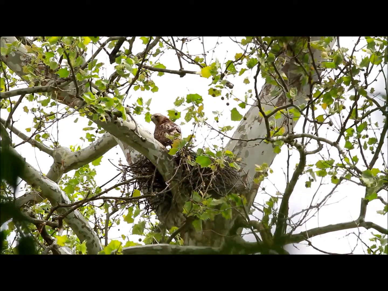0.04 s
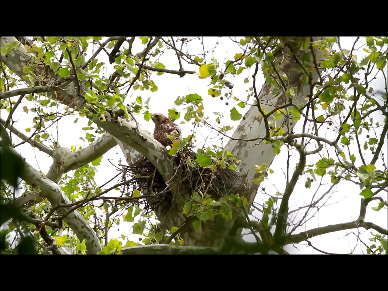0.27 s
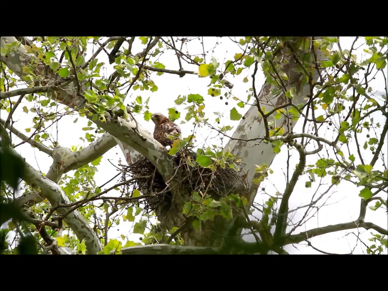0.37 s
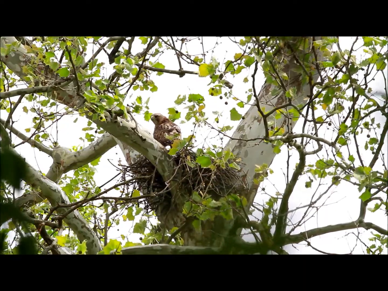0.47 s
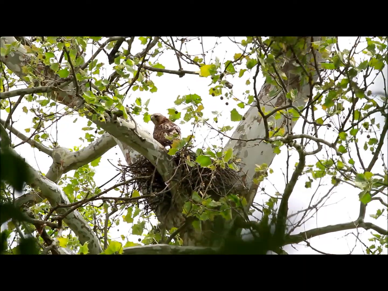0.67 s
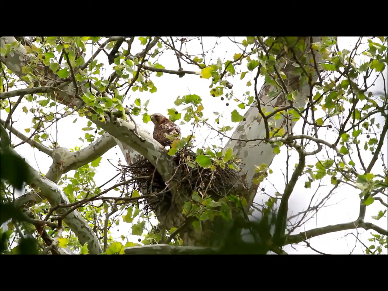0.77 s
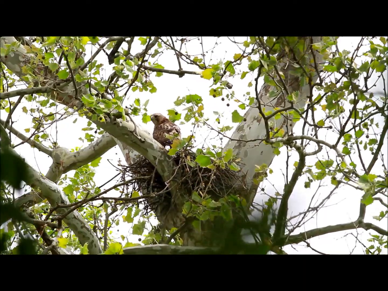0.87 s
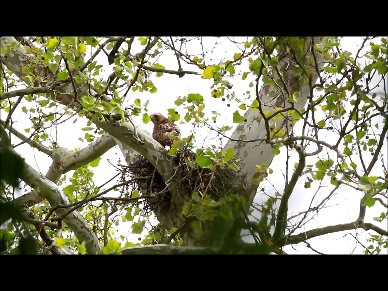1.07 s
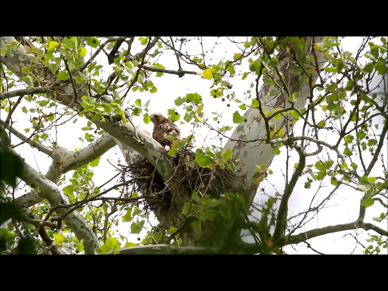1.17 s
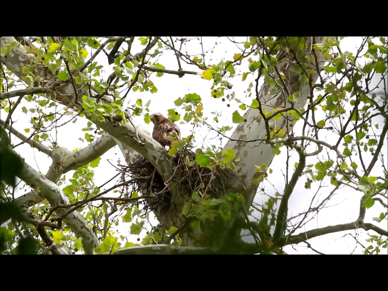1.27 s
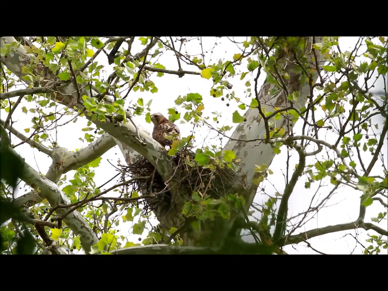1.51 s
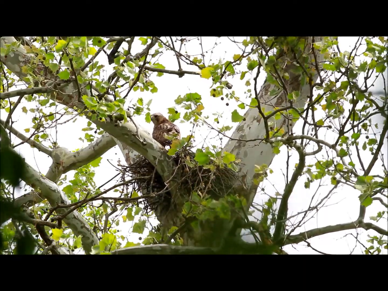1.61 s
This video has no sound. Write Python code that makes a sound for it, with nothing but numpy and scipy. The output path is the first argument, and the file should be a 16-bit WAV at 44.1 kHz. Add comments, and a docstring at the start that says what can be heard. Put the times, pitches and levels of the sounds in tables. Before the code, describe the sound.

A hawk gives a sharp, high, slightly raspy chirp at about 0.25 seconds, echoing briefly among the trees. From 0.5 seconds, faint short bird calls repeat farther off, with two hissy chips near 0.6 and 1.1 seconds. The hawk chirps again, more softly, at about 1.15 seconds, and one last distant call follows at 1.5. A soft rumble of air and distant traffic runs throughout.

```python
"""A soft rumble of air and distant traffic runs throughout. A hawk chirps sharply among trees, both sides
of its voice box sounding at once: it sweeps up with a rasp, holds two tones and drops away, and trunks
and leaves scatter the sound. Farther off, faint arched calls begin, with two hissy chips among them.
The hawk chirps again, more softly, and one last far call follows."""
import sys
import numpy as np
from scipy import signal
from scipy.fft import rfft, irfft
from scipy.io import wavfile

SR = 44100
rng = np.random.default_rng(int(sys.argv[2]) if len(sys.argv) > 2 else 0)


def transcribe(signal):
    """Save signal, clipped to [-1, 1], as a 16-bit WAV file at the path in sys.argv[1]."""
    frames = np.atleast_2d(signal).T
    limited = np.clip(frames, -1, 1)
    pcm = np.round(limited * 32767).astype(np.int16)
    wavfile.write(sys.argv[1], SR, pcm)


N = 72765
T = np.arange(N) / SR
BIN_HZ = np.arange(N // 2 + 1) * SR / N


def from_db(db):
    """Decibels to gain."""
    return 10 ** (np.asarray(db) / 20)


def rms_one(x):
    """Scale to rms 1."""
    return x / np.sqrt(np.mean(x ** 2) + 1e-20)


def at_hz(points, hz):
    """Read a curve on a log-frequency axis."""
    freqs, values = np.transpose(points)
    return np.interp(np.log(np.maximum(hz, 1)), np.log(freqs), values)


def noise(spectrum):
    """Noise coloured by an EQ curve, rms 1."""
    return rms_one(irfft(rfft(rng.standard_normal(N)) * from_db(at_hz(spectrum, BIN_HZ)), N))


def narrow(hz, width_hz):
    """Noise in one steep resonance, rms 1; at 0 Hz a random wobble."""
    resonance = 1 + (2 * (BIN_HZ - hz) / width_hz) ** 2
    return rms_one(irfft(rfft(rng.standard_normal(N)) / resonance, N))


# Colour of the air and traffic: freq_hz, gain_db
AIR_EQ = [(25, -15), (40, -24), (62, -2), (80, -5), (115, 0), (170, -4), (320, -5.5), (480, -4), (800, -8),
          (1300, -13.5), (2000, -14.5), (4000, -19), (6300, -23.5), (8200, -29.5), (10500, -31.5),
          (13300, -31.5), (15500, -40)]
# Distant engine drone: pitch_hz, level_db
DRONE_TONES = [(122.5, -63), (246, -52.5)]
# Gentle fader ride on the whole bed: time_s, gain_db
BED_RIDE = [(0, 0), (.45, 0), (.7, 0.1), (1, -0.5), (1.35, -0.35), (1.65, -0.3)]


def air_and_traffic():
    """A soft bed of air and far traffic with a faint engine drone."""
    rumble = from_db(-39.5) * noise(AIR_EQ)
    drone = sum(from_db(db) * narrow(hz, width_hz=9.2) for hz, db in DRONE_TONES)
    return from_db(np.interp(T, *np.transpose(BED_RIDE))) * (rumble + drone)


def voice_phase(hz):
    """Running phase of a voice whose pitch wavers by 0.6 percent."""
    return 2 * np.pi * np.cumsum(hz * (1 + .006 * narrow(0, width_hz=540))) / SR


def call_stages(start_s, rise_s, hold_s, fall_s):
    """A call's stage (rise 0-1, hold 1-2, fall 2-3) and a soft gate round it."""
    stage = np.interp(T, start_s + np.cumsum([0, rise_s, hold_s, fall_s]), np.arange(4))
    return stage, np.clip(np.minimum(stage, 3 - stage) / .08, 0, 1)


# Colour of the rasp: freq_hz, gain_db
RASP_EQ = [(1500, -26), (2600, -2.5), (4000, -7.5), (5300, 2.5), (6600, -9), (7500, -10.5), (10000, -16.5),
           (11400, -10), (13000, -15), (15500, -29)]
# Rough squeaks inside the rasp: pitch_hz, gain_db
RASP_SQUEAKS = [(5100, -8.5), (5530, -9)]
# Envelope of the rasp: stage, gain_db
RASP_ENVELOPE = [(0, -4), (.6, 3), (1, 2), (2, -11), (3, -22)]


def hawk_rasp(stage, level_db):
    """Squeaky grit that bites on the upsweep and fades through the hold."""
    grit = noise(RASP_EQ) + sum(from_db(db) * narrow(hz, width_hz=280) for hz, db in RASP_SQUEAKS)
    return from_db(level_db + np.interp(stage, *np.transpose(RASP_ENVELOPE))) * grit


# Envelopes of the hawk's two voices: stage, low_gain_db, high_gain_db
VOICE_ENVELOPES = [(0, -23, -17), (.35, -24, -9), (.6, -15, 10), (.76, -13, 1), (1, -5, 1), (1.45, 1, -3.5),
                   (1.7, -1.5, -3), (2, -6, -7), (2.4, -6, -15), (3, -18, -28)]
# The sharp chirp, then the soft one, with levels before the envelopes: start_s, hold_s, low_hz, high_hz,
# dip_share, low_db, high_db, rasp_db, overtones_db, sum_tone_db, glide_vs_hold_db, scatter_db
HAWK_CHIRPS = [(0.241, 0.043, 3808, 6590, .013, -22, -30.5, -32, -39, -58, -0.5, 0.5),
               (1.144, .046, 4023, 6764, 0.0238, -30.5, -42, -51.5, -70, -58, -3.5, 6)]


def hawk_chirp(start_s, hold_s, low_hz, high_hz, dip_share,
               low_db, high_db, rasp_db, overtones_db, sum_tone_db, glide_vs_hold_db):
    """Both sides of the voice box sweep up, hold and drop, mixing into sum and difference tones."""
    rise_s = .032
    stage, gate = call_stages(start_s, rise_s, hold_s, fall_s=.013)
    age_s = np.clip(T - start_s, 0, rise_s + hold_s)
    hold, fall = np.clip(stage - 1, 0, 1), np.clip(stage - 2, 0, 1)
    dip = 1 - dip_share * np.exp(-((stage - 1.625) / .393) ** 2)   # the pitch dips once in the hold

    def glide(hz, start_ratio, end_ratio, middle_s, width_s):
        sweep = start_ratio + (1 - start_ratio) * (1 + np.tanh((age_s - middle_s) / width_s)) / 2
        return voice_phase(hz * sweep * dip * end_ratio ** fall)
    low = glide(low_hz, start_ratio=.52, end_ratio=.42, middle_s=.0195, width_s=.009)
    sagging_hz = high_hz * (1 - .0123 * hold)
    high = glide(sagging_hz, start_ratio=.52, end_ratio=.88, middle_s=.0192, width_s=.0062)
    stages, low_gain_db, high_gain_db = np.transpose(VOICE_ENVELOPES)
    voices = from_db(low_db + np.interp(stage, stages, low_gain_db)) * np.sin(low)
    voices += from_db(high_db + np.interp(stage, stages, high_gain_db)) * np.sin(high)
    rough_octave = np.sin(2 * high) * (1 + .63 * narrow(0, width_hz=1600))
    overtones = from_db(overtones_db) * (rough_octave + from_db(-14) * np.sin(3 * low))
    sum_tone = from_db(sum_tone_db) * np.sin(high + low)
    difference_tone = from_db(high_db - 4) * hold * np.sin(high - low)
    held = np.clip((stage - .7) / .25, 0, 1) * (1 - fall) ** 4   # opens as the pitch levels out
    tones = from_db(glide_vs_hold_db * (1.5 - held)) * voices
    tones += held * (overtones + sum_tone + difference_tone)
    return gate * (np.sqrt(2) * tones + hawk_rasp(stage, rasp_db))


# Slaps off groups of trunks: delay_s, gain_db
TRUNK_ECHOES = [(0.036, -18), (0.08, -12.5), (.125, -24), (.182, -26)]
# Reverb time among the trees: freq_hz, t60_s
TREE_DECAY = [(1500, 0.24), (4000, 0.66), (6500, 0.73), (13000, 0.31)]


def among_trees(call, tail_db, scatter_db):
    """A call plus quick scatter off leaves, blurred trunk echoes and a tail longest around 4-7 kHz."""
    def burst(envelope):
        return rms_one(rng.standard_normal(N) * envelope) / np.sqrt(N)

    def decay(t60_s):
        return burst(from_db(-60 * T / t60_s))
    edges_hz, tail = np.geomspace(1000, 16000, 7), 0
    for low, high in zip(edges_hz, edges_hz[1:]):
        band = signal.butter(2, [low, high], "band", fs=SR, output="sos")
        tail += signal.sosfilt(band, decay(at_hz(TREE_DECAY, np.sqrt(low * high))))
    leaves = from_db(-9) * decay(t60_s=.16)
    trunks = sum(from_db(db) * burst(np.exp(-abs(T - delay_s) / .012)) for delay_s, db in TRUNK_ECHOES)
    trunks = signal.sosfilt(signal.butter(1, 17600, fs=SR, output="sos"), trunks)
    wash = (from_db(tail_db) * tail + leaves) * np.clip(T / .012, 0, 1)
    return call + from_db(scatter_db) * signal.fftconvolve(call, wash + trunks)[:N]


# Faint calls in the distance: start_s, hold_s, low_hz, high_hz, low_db, high_db
DISTANT_CALLS = [(0.507, 0.0094, 1662, 2970, -48, -48.5), (.68, 0.01244, 1780, 2880, -42.5, -44),
                 (0.896, 0.012, 1780, 2906, -41.5, -41), (1.143, 0.01156, 1770, 2836, -43, -50),
                 (1.5, 0.0097, 1674, 2970, -47.5, -49)]


def far_call(start_s, hold_s, low_hz, high_hz, low_db, high_db):
    """A short, fluttering two-voiced arch whose low voice fades as the pitch falls."""
    stage, gate = call_stages(start_s, rise_s=.008, hold_s=hold_s, fall_s=.019)
    rise, fall = np.clip(stage, 0, 1), np.clip(stage - 2, 0, 1)
    arch = (1 - .14 * (1 - rise) ** 2) * (1 - .3 * fall ** 1.33)
    low = from_db(low_db - 3 * fall) * np.sin(voice_phase(low_hz * arch))
    high = from_db(high_db) * np.sin(voice_phase(high_hz * arch))
    return gate * rise * sum(voice * (1 + .45 * narrow(0, width_hz=220)) for voice in (low, high))


# Hissy chips in the distance: start_s, level_db
CHIP_CUES = [(0.605, -44), (1.093, -44)]
# Colour of their hiss: freq_hz, gain_db
CHIP_EQ = [(2200, -22), (3200, 3), (4000, 8), (5200, 3.5), (6300, -9), (9000, -24)]


def far_chips(attack_s=.01, t60_s=.66):
    """Far chips, each blurred by distance to a puff of hiss."""
    envelope = 0
    for start_s, level_db in CHIP_CUES:
        attack = np.clip((T - start_s) / attack_s, 0, 1)
        decay_db = 60 * np.maximum(T - start_s - attack_s, 0) / t60_s
        envelope += attack * from_db(level_db - decay_db)
    return envelope * noise(CHIP_EQ)


def scene():
    """One mono mix on both channels; the softer chirp comes more by way of the trees."""
    hawk = sum(among_trees(hawk_chirp(*chirp), tail_db=-8, scatter_db=db) for *chirp, db in HAWK_CHIRPS)
    calls = among_trees(sum(far_call(*call) for call in DISTANT_CALLS), tail_db=-4, scatter_db=0)
    return np.tile(hawk + calls + far_chips() + air_and_traffic(), (2, 1))


def record(dry):
    """A steep high cut at 15.8 kHz."""
    return signal.sosfilt(signal.ellip(12, .1, 80, 15800, fs=SR, output="sos"), dry)


dry = scene()
out = record(dry)
transcribe(out)
```